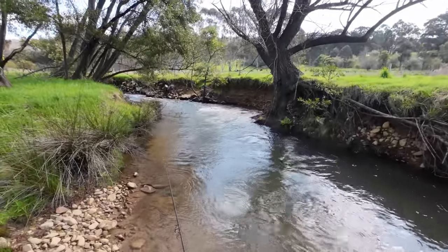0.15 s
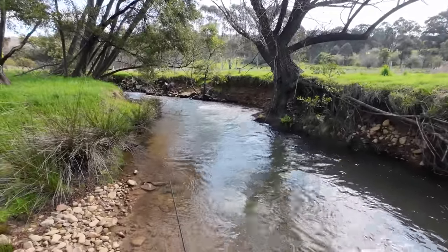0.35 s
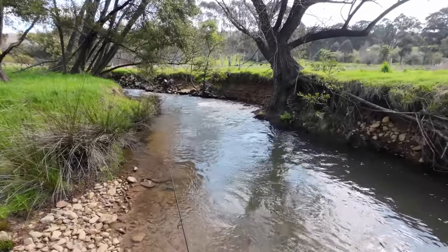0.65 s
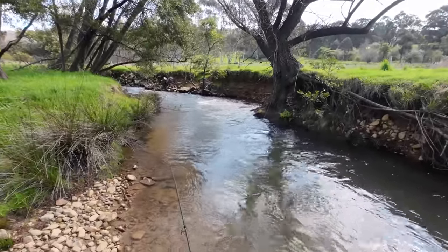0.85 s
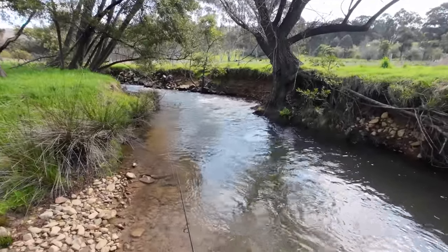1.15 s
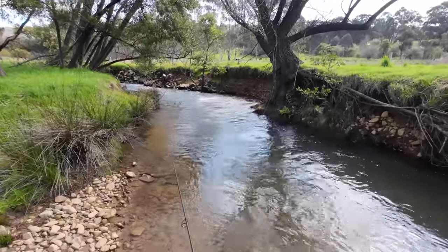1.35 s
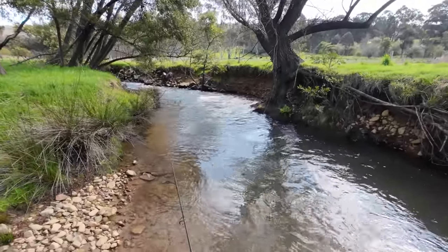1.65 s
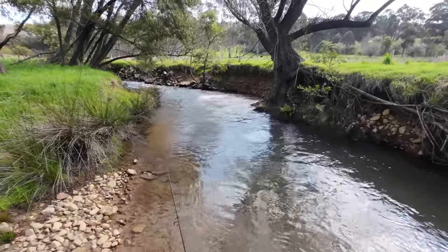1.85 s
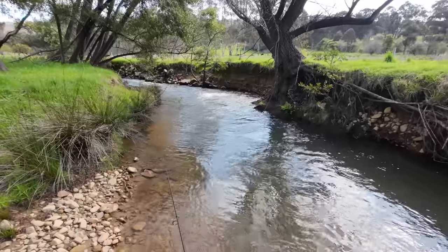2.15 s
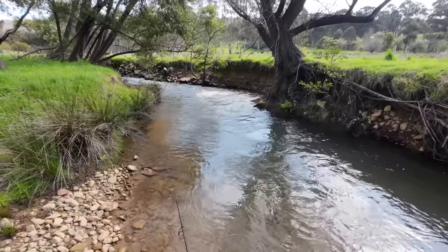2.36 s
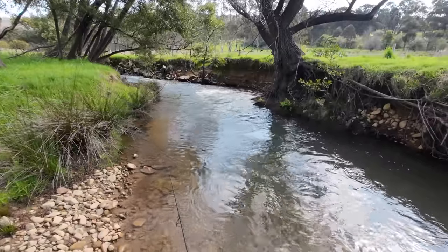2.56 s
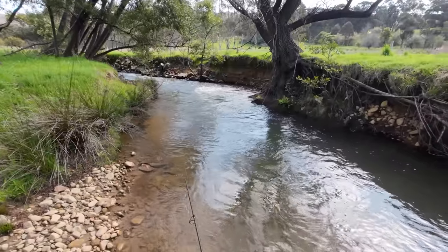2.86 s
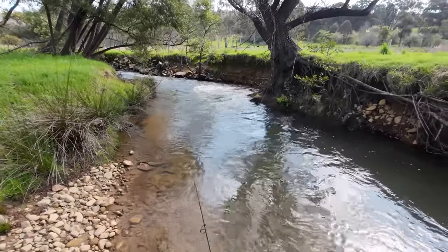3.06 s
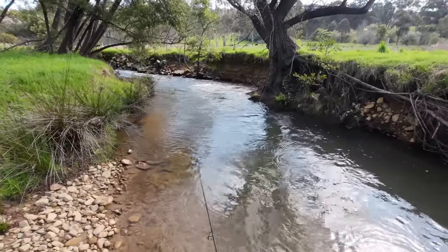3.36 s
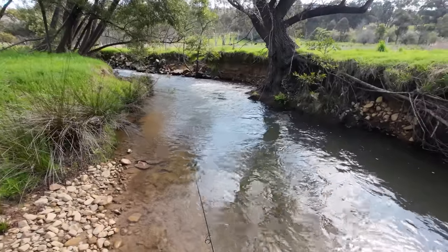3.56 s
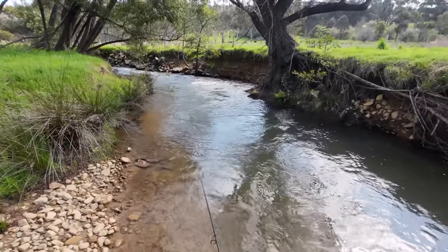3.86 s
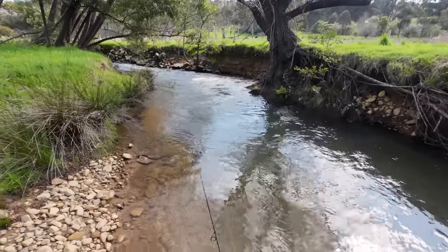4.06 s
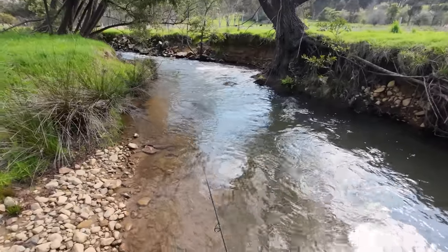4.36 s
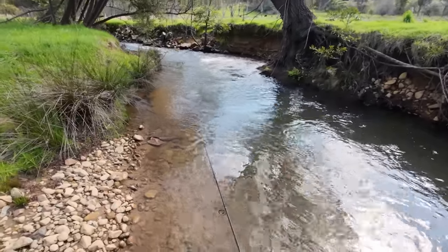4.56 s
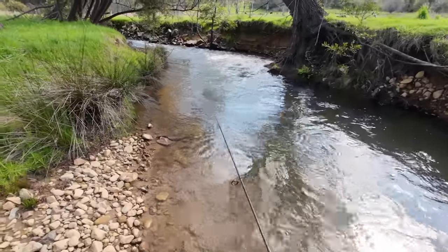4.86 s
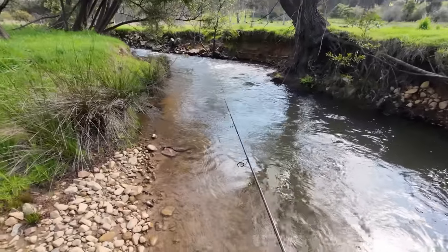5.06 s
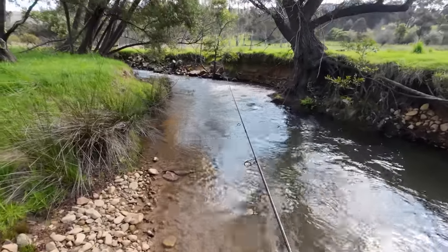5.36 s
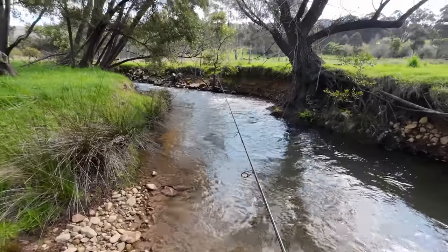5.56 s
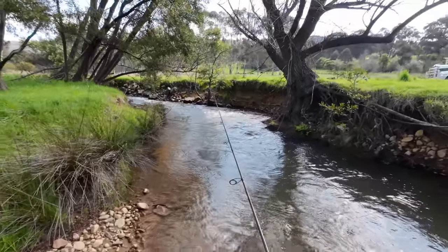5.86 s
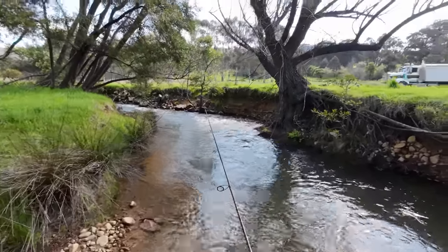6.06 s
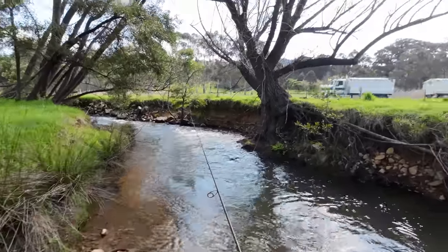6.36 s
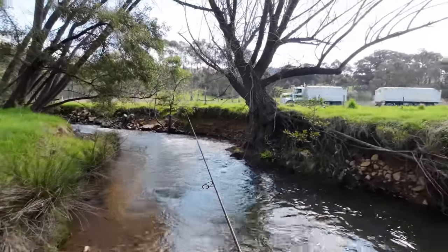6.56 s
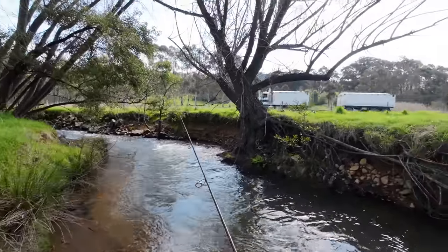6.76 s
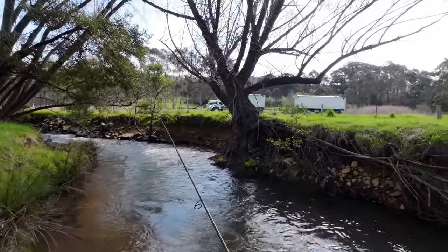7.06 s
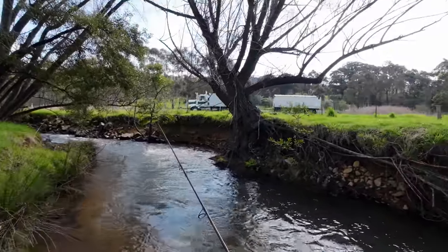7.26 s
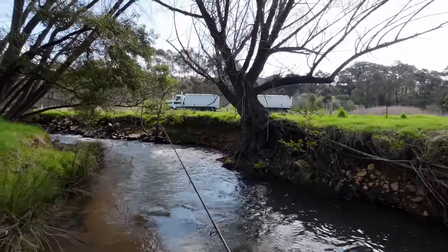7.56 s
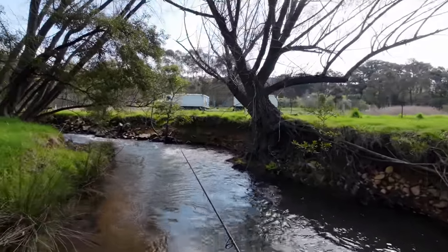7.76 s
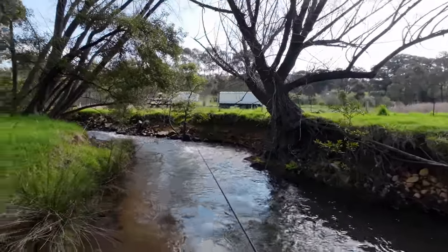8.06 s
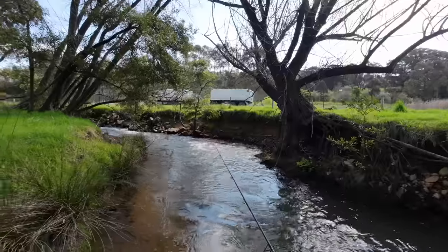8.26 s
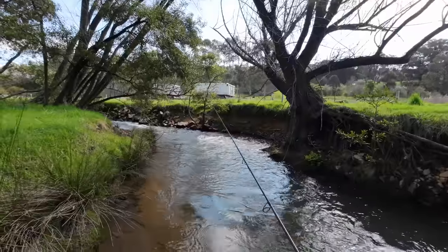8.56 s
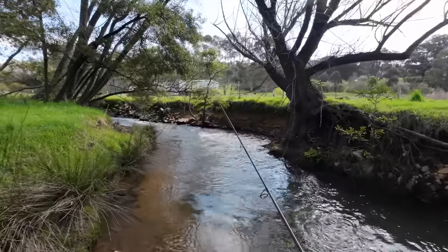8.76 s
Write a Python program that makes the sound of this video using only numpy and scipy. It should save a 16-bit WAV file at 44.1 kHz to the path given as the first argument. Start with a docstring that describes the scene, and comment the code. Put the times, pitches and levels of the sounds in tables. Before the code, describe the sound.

A heavy truck's engine brake drones and barks beyond a quiet creek, swelling through downshifts as it passes, dropping to a hum, then surging back.

```python
"""Engine brake beyond the creek

A six-cylinder truck comes down the road on its engine brake, shifts down twice and passes.
Each exhaust blast, a pulse with a puff of gas noise, rings the stack over a drone of firing orders.
Between the bursts the throttle hums and a turbo whistles; tyres roar as shaped noise with a tread hum.
Near the microphones the creek runs as steady noise, a small bird chips in quick sliding tones,
and fishing tackle clicks as short dying bursts of noise with a ping."""
import sys
import numpy as np
from scipy import signal
from scipy.fft import rfft, irfft, next_fast_len
from scipy.io import wavfile
from scipy.ndimage import uniform_filter1d, map_coordinates

SR = 44100
rng = np.random.default_rng(int(sys.argv[2]) if len(sys.argv) > 2 else 0)


def dump_mix(stems):
    """Bounce the given channels to the path in sys.argv[1] as a 16-bit WAV at rate SR."""
    frames = np.atleast_2d(stems).T  # one column per channel
    limited = np.clip(frames, -1, 1)  # hard clip at full scale
    pcm = np.round(limited * 32767).astype(np.int16)
    wavfile.write(sys.argv[1], SR, pcm)


N = 393633
T = np.arange(N) / SR  # s

# firing rate of the engine, sinking under the brake and revved up for each shift: time_s, firing_hz
FIRING_RATE = [(0.0, 66.44), (0.66, 62.14), (0.88, 76.74), (1.2, 70.5), (1.6, 74.66), (2.2, 70.45),
               (3.2, 65.51), (4.3, 59.68), (6.0, 51.55), (6.65, 50.26), (7.3, 69.22), (7.65, 66.09),
               (8.05, 62.56), (8.3, 64.2), (8.93, 61.6)]
# the three bursts of the brake, far off, passing and leaving: time_s, bark_db (before the exhaust mix)
FAR_BURST = [(0, -40), (0.561, -36.5)]
PASSING_BURST = [(1.535, -38), (2.0, -39), (2.7, -34.5), (3.5, -31.5), (4.3, -27), (5.1, -24),
                 (6.567, -20.5)]
LEAVING_BURST = [(8.321, -22.5), (8.93, -28.5)]
# the cylinders in firing order: blast_db (scaled by a contrast), lateness_s
CYLINDERS = np.array([(0, 0), (.6, .0006), (0, .0003), (-.8, -.0002), (2.3, 0), (-.4, .0003)])


def exhaust():
    """Drone, throttle and three bursts; the stack's colour turns as the truck draws level and leaves."""
    # the stack heard from ahead, drawing near, from the side and from behind: freq_hz, relative_db
    ahead_stack = [(150, -39), (280, -1), (360, 4.5), (450, 0.5), (540, -3.5), (700, -4), (950, -13.5),
                   (1300, -23), (2500, -38.5), (5000, -63.5)]
    nearing_stack = [(150, -55.5), (260, 9.5), (335, 5), (450, -2.5), (550, -11), (700, -15.5),
                     (1000, -18.5), (1400, -32.5), (1900, -45), (3000, -35.5), (5000, -79.5)]
    abreast_stack = [(130, -32), (220, -17), (275, 10.5), (355, 13.5), (420, 2), (520, -8.5), (680, -5),
                     (800, -11), (920, -11), (1100, -16), (1300, -26.5), (1800, -46), (2600, -31),
                     (6000, -91)]
    behind_stack = [(200, -29.5), (300, 6), (370, 5), (450, 3.5), (560, 1), (680, 1), (900, -2),
                    (1100, -18), (1600, -39), (2400, -32), (4000, -45), (8000, -47.5), (13000, -73)]
    # low resonances of the exhaust pipe: centre_hz, width_hz, relative_db
    pipe = [(38, 20, -19.5), (86, 11, -4.5), (172.4, 24, -1.5), (267, 21, -5)]
    pipe_behind = [(42, 20, -31), (129, 160, -8.5), (169.4, 15, 5.5), (259, 32, -32)]  # serves the far and the leaving burst
    firings = np.cumsum(curves(FIRING_RATE)[0]) / SR  # running count of firings
    flow = turbulence(firings)
    far = brake(firings, flow, FAR_BURST, nearing_stack, pipe_behind,
                rasp_db=-8.0, crack_db=-22.0, lope_db=3, echo=0.19, contrast=0.184)
    ahead = brake(firings, flow, PASSING_BURST, ahead_stack, pipe,
                  rasp_db=-7, crack_db=-9, lope_db=3, echo=0.18, contrast=1.0)
    nearing = brake(firings, flow, PASSING_BURST, nearing_stack, pipe,
                    rasp_db=-4, crack_db=-15.5, lope_db=-2, echo=0.29, contrast=0.59)
    abreast = brake(firings, flow, PASSING_BURST, abreast_stack, pipe,
                    rasp_db=-6.5, crack_db=-15.5, lope_db=-5.5, echo=0.46, contrast=.75)
    behind = brake(firings, flow, LEAVING_BURST, behind_stack, pipe_behind,
                   rasp_db=-7, crack_db=-9.5, lope_db=3.5, echo=0.6, contrast=0.55)
    # the passing burst crossfades from ahead to nearing to abreast
    near = np.clip((T - 2.5) / .9, 0, 1)
    level_with = np.clip((T - 4.3) / 0.88, 0, 1)
    passing = (1 - near) * ahead + near * (1 - level_with) * nearing + level_with * abreast
    rough = braking(PASSING_BURST) * uneven_part(passing, firings)
    bursts = rough + amp(2.5) * far + amp(0.7) * behind
    swell = firings - .02  # the slow pressure swell peaks just after each blast
    return drone(swell) + bursts + flares(firings, flow) + throttle(swell) + hard_cracks()


def brake(firings, flow, burst, stack, modes, rasp_db, crack_db, lope_db, echo, contrast):
    """A burst of the brake: blasts and their gas ring the stack; unequal cylinders lope in the low pipe modes."""
    pulses, uneven = blasts(firings, contrast)
    gas = puffs(pulses, flow, decay_s=0.0076)
    # only the hardest blasts steepen into a bright crack
    crack = filtered(unit(pulses ** 4), lambda f: 1j * f / (550 + 1j * f))
    # gas and crack, both lifted more in the treble
    lift = [(300, 8.3), (600, 15.0), (1200, 15.04)]
    rasp = filtered(amp(rasp_db) * gas + amp(crack_db) * crack, lambda f: amp(along(lift, f)))
    bark = unit(reflected(ring(pulses + rasp, stack), echo))

    def pipe_response(f):
        """Resonances of alternating sign, dulled above 320 Hz."""
        total = 0
        for k, (centre, width, db) in enumerate(modes):
            damping = 1j * f * width
            total = total + (-1) ** k * amp(db) * damping / (centre * centre - f * f + damping)
        return total / (1 + 1j * f / 320) ** 2

    lope = unit(filtered(uneven + 0.44 * gas, pipe_response))
    engaged = 1. * ((T >= burst[0][0]) & (T <= burst[-1][0]))
    engaged = uniform_filter1d(engaged, size=256)  # soft edges
    return engaged * amp(curves(burst)[0]) * (bark + amp(lope_db) * lope)


def blasts(firings, contrast, scatter_db=.45, jitter_s=.00008):
    """One pulse per firing, sized and timed by its cylinder; also the pulses' departures from their mean size."""
    at = np.flatnonzero(np.diff(np.floor(firings)))
    chance = rng.standard_normal((len(at), 2))
    blast_db, late_s = CYLINDERS[np.arange(len(at)) % len(CYLINDERS)].T
    size = amp(contrast * blast_db + scatter_db * chance[:, 0])
    shift = np.round(SR * (late_s + jitter_s * chance[:, 1])).astype(int)
    at = np.clip(at + shift, 0, N - 1)
    pulses, uneven = np.zeros((2, N))
    pulses[at] = size
    uneven[at] = size - size.mean()
    return unit(pulses), unit(uneven)


def turbulence(firings, count=3, size=1024):
    """Gas noise that each cylinder repeats at its every firing, slowly changing shape."""
    drift_per_s, fresh_share = 2.0, .12  # pace of the change; power share of noise that never repeats
    firing = np.floor(firings).astype(int)
    age = np.arange(N) - np.searchsorted(firing, firing)  # samples since the firing
    shapes = rng.standard_normal((count, len(CYLINDERS), size))
    shapes = shapes[:, firing % len(CYLINDERS), age % size]
    weights = np.array([wobble(drift_per_s) for _ in shapes])
    kept = np.sum(shapes * weights, axis=0) / np.linalg.norm(weights, axis=0)
    return np.sqrt(1 - fresh_share) * kept + np.sqrt(fresh_share) * rng.standard_normal(N)


def puffs(pulses, flow, decay_s):
    """A dying burst of gas noise after each pulse."""
    envelope = signal.lfilter([1], [1, -np.exp(-1 / (decay_s * SR))], pulses)
    return unit(envelope * flow)


def uneven_part(x, firings, count=8, size=12000):
    """What changes from blast to blast: x without the steady low orders, which belong to the drone."""
    step = np.exp(2j * np.pi * firings)
    turn = step
    for _ in range(count):
        steady = uniform_filter1d(x * turn.conj(), size=size)
        x = x - 2 * (turn * steady).real
        turn = turn * step
    return x


def reflected(x, echo):
    """The sound and its reflection, whose lag is longest with the truck nearest and sweeps a comb through it."""
    longest_lag_s, closest_s, pass_s = .0059, 7.05, 1.75
    late = T - longest_lag_s / np.hypot(1, (T - closest_s) / pass_s)
    return (x + echo * np.interp(late, T, x)) / np.hypot(1, echo)


def hard_cracks(echo=0.83):
    """Single blasts of the passing and leaving bursts crack hard and bright, hardest at 8.37 s."""
    # time_s, relative_db
    cracks = [(1.557, -22), (1.568, -34), (1.585, -26), (2.826, -29), (2.915, -24.5), (4.241, -24),
              (4.341, -21), (4.442, -23), (4.544, -23), (4.646, -23), (8.3256, -16.5), (8.372, -6.5),
              (8.454, -23), (8.511, -25), (8.607, -21), (8.702, -21), (8.752, -25), (8.847, -20),
              (8.894, -27)]
    # their colour: freq_hz, relative_db
    crack_colour = [(120, -22), (300, -7), (450, 7), (650, 10), (880, 3.5), (1150, -2), (1700, -32),
                    (2450, -6), (3200, -21.5), (4500, -31), (8000, -64), (13000, -84)]
    hits = np.zeros(N)
    for s, db in cracks:
        hits[round(s * SR)] = amp(db + 14.5)
    return reflected(ring(hits, crack_colour), echo)


def flares(firings, flow):
    """The blasts and their gas ring resonances that flare up and glide in pitch as the truck moves."""
    # start_s, end_s, start_hz, end_hz, width_hz, level_db
    resonances = [(3.5, 5.2, 374, 334, 69.5, -39), (6.102, 6.573, 370, 354, 45, -34),
                  (8.33, 8.746, 2470, 1970, 350, -52)]
    rise_share, release_s = 0.43, 0.036  # share of a flare spent rising; its fall
    pulses, _ = blasts(firings, contrast=1.3)
    source = pulses + puffs(pulses, flow, decay_s=0.0065)
    sound = np.zeros(N)
    for start, end, from_hz, to_hz, width_hz, db in resonances:
        hz = np.interp(T, [start, end], [from_hz, to_hz])
        turn = np.exp(2j * np.pi * np.cumsum(hz) / SR)
        # shifted down to zero pitch, low-passed and shifted back up
        slow = signal.lfilter(*signal.butter(2, width_hz / SR), source / turn)
        rung = unit((turn * slow).real)
        sound += amp(db) * gate(start, end, rise_share * (end - start), release_s) * rung
    return sound


def drone(firings, count=8):
    """The clean firing orders: smeared by the pipe from afar, one sharp pulse per firing from the side."""
    # the three lowest orders during the passing burst: time_s, level_db
    fundamental = [(1.535, -30), (1.65, -26), (2.1, -29), (2.5, -22), (2.9, -22), (3.3, -18), (4.1, -14.5),
                   (4.5, -15), (5.1, -18), (6.57, -20.5)]
    second = [(1.535, -34), (1.62, -24), (2.1, -25), (2.55, -21), (2.9, -27.5), (4.35, -26), (4.65, -37.5),
              (5.1, -27), (5.7, -34), (6.57, -31.5)]
    third = [(1.6, -27.5), (2.5, -28), (2.9, -35), (3.3, -29), (3.8, -28.5), (4.25, -20), (4.42, -34.5),
             (4.57, -20.5), (4.73, -22.5), (4.85, -41), (5.0, -23), (5.6, -29), (5.95, -18.5), (6.25, -21),
             (6.57, -25)]
    # the same three orders in the first and the last burst: level_db
    far_orders = [-23, -29.5, -29.5]
    leaving_orders = [-24.5, -25.5, -21.5]
    # two gliding resonances lift the orders above the third: time_s, centre_hz, peak_db
    low_focus = [(1.6, 293, -36.5), (2.55, 278, -31.5), (2.9, 330, -38.5), (3.3, 265, -38.5),
                 (3.7, 284, -31), (4.1, 276, -34.5), (4.4, 248, -26.5), (4.65, 298, -29.5),
                 (4.85, 306, -25), (5.1, 263, -25), (5.4, 244, -17), (5.7, 236, -18), (6.0, 215, -21),
                 (6.57, 195, -22.5)]
    high_focus = [(1.6, 540, -56), (2.1, 424, -40), (2.5, 448, -42), (3.7, 409, -38), (4.4, 388, -35.5),
                  (5.1, 369, -30), (5.4, 440, -33), (5.7, 403, -29.5), (6.0, 355, -29.5), (6.25, 350, -28),
                  (6.57, 343, -25.5)]
    resonances = [(*curves(low_focus), 47.5), (*curves(high_focus), 59.4)]  # width in Hz last
    hz, = curves(FIRING_RATE)
    far, passing, leaving = braking(FAR_BURST), braking(PASSING_BURST), braking(LEAVING_BURST)
    gains = []
    for rows, far_db, leaving_db in zip((fundamental, second, third), far_orders, leaving_orders):
        gains.append(passing * amp(curves(rows)[0]) + far * amp(far_db) + leaving * amp(leaving_db))
    for k in range(len(gains) + 1, count + 1):
        lift = sum(amp(db) * np.exp(-((k * hz - centre) / width) ** 2) for centre, db, width in resonances)
        gains.append(passing * lift)
    # the orders line up as the truck draws level, until it leaves
    from_s, over_s = 3.5, 1.5
    side = np.clip((T - from_s) / over_s, 0, 1) * (T < LEAVING_BURST[0][0])
    side_lag, dispersion = .11, .08  # cycles: equal steps from the side, growing with the order from afar
    tone = np.zeros(N)
    for k, gain in enumerate(gains, 1):
        lag = (k - 1) * (side * side_lag + (1 - side) * dispersion * k)
        tone += gain * np.cos(2 * np.pi * (k * firings - lag))
    return np.sqrt(2) * amp(.6 * wobble(14)) * tone


def throttle(firings, count=4):
    """With the brake off, each push on the throttle gives a soft hum with few overtones, over a faint idle."""
    # pushes during the shifts: start_s, end_s, fundamental_db, second_order_db
    pushes = [(.64, 1.055, -26, -40), (1.185, 1.257, -19.5, -38), (6.645, 7.002, -18.5, -47),
              (6.91, 7.56, -26.5, -30.5), (7.476, 7.903, -22, -31)]
    attack_s, release_s, fall_db = 0.13, 0.068, 11.5  # the fall is per order above the second
    deep, upper = amp(-38), amp(-43)  # lowest levels, held throughout
    for start, end, deep_db, second_db in pushes:
        push = gate(start, end, attack_s, release_s)
        deep = np.maximum(deep, amp(deep_db) * push)
        upper = np.maximum(upper, amp(second_db) * push)
    overtones = sum(amp(-fall_db * (k - 2)) * np.cos(2 * np.pi * k * firings) for k in range(2, count + 1))
    hum = deep * np.cos(2 * np.pi * firings) + upper * overtones
    return np.sqrt(2) * amp(1.5 * wobble(4.0)) * hum


def rolling():
    """Tyre roar, howl and hiss swell with the pass, tread hum sinks in pitch, rumble grows under the brake."""
    # colours of the noises, the howl thrown forward of the truck: freq_hz, relative_db
    roar_colour = [(160, -9.5), (280, -10.5), (450, -2), (570, -11.5), (700, -6.5), (980, -13), (1300, -15),
                   (1900, -19), (2800, -21.5), (3600, -23), (6000, -31), (9000, -55)]
    howl_colour = [(150, -29), (260, -2), (330, 3), (430, -3), (560, -29), (1000, -54)]
    hiss_colour = [(1800, -27), (3000, -24), (3600, 3), (4400, -9.5), (5200, 3.5), (6100, -1.5), (6800, -8),
                   (7600, -2), (8800, -11.5), (10000, -7.5), (11400, -7.5), (12400, -41), (15500, -53.5)]
    rumble_colour = [(12, -28), (25, 3), (45, 2), (90, -2), (160, -1), (240, -6.5), (350, -20),
                     (600, -25.5), (1200, -75.5)]
    roar = passing_by(closest_s=7.24, half_s=1.35, db=-39) * rush(roar_colour, patchy_db=1.1)
    roar = roar * amp(0.18 * wobble(20))
    howl = passing_by(closest_s=6.44, half_s=0.45, db=-32.5) * rush(howl_colour, patchy_db=1.0)
    hiss = passing_by(closest_s=6.4, half_s=0.65, db=-51) * rush(hiss_colour, patchy_db=.6)
    hiss = hiss * amp(.8 * wobble(5))
    engaged = braking(FAR_BURST) + braking(PASSING_BURST) + braking(LEAVING_BURST)
    rumble_db = -28 + 2 * engaged + 0.22 * wobble(6.7)
    rumble = amp(rumble_db) * rush(rumble_colour, patchy_db=1.5)
    # the tread's pitch glides down by its Doppler share to either side of 230.5 Hz
    doppler, abreast_s, turn_s = 0.066, 7.5, 0.495
    tread_hz = 230.5 * (1 - doppler * np.tanh((T - abreast_s) / turn_s))
    tone = np.sin(2 * np.pi * np.cumsum(tread_hz + 2 * wobble(7)) / SR)
    hum = unit(tone + .35 * fuzzy_tone(tread_hz, width_hz=30))
    from_s, rise_s = 5.8, .8
    tread = amp(-31.5) * np.clip((T - from_s) / rise_s, 0, 1) * hum
    return roar + howl + hiss + rumble + tread


def passing_by(closest_s, half_s, db):
    """Gain of a source on a straight road: one over its distance, 3 dB below the peak half_s from the closest."""
    return amp(db) / np.hypot(1, (T - closest_s) / half_s)


def whines():
    """Faint narrow tones of the rolling truck that come and go, sinking as it draws away."""
    # start_s, end_s, start_hz, end_hz, level_db
    tones = [(6.901, 7.901, 1374, 1280, -55.5), (7.5, 7.9, 702, 672, -49), (7.975, 8.3, 843, 825, -47)]
    sound = np.zeros(N)
    for start, end, from_hz, to_hz, db in tones:
        hz = np.interp(T, [start, end], [from_hz, to_hz])
        sound += amp(db) * gate(start, end, attack_s=0.14, release_s=.1) * fuzzy_tone(hz, width_hz=55)
    return sound


def turbo():
    """The turbo whistles, a fuzzy tone, as it runs down; air rushes in short swells of noise."""
    # whistle: time_s, pitch_hz, level_db
    whistle_glide = [(3.5, 6400, -83), (4.8, 5870, -59), (6.4, 5075, -53), (7.4, 5090, -94)]
    # swells of air, the first as the throttle is blipped: start_s, end_s, level_db
    swells = [(.62, 1.095, -46.5), (5.885, 6.052, -42.5), (6.33, 6.465, -47)]
    # colour of the air: freq_hz, relative_db
    air_colour = [(600, -22), (1000, 1), (1700, -10), (2400, 0.5), (3100, 1.5), (3900, -10), (6000, -12),
                  (8000, -37), (13000, -80)]
    rise_share, release_s = 0.87, 0.05  # share of a swell spent rising; its fall
    hz, db = curves(whistle_glide)
    whistle = amp(db) * unit(fuzzy_tone(hz, width_hz=400) + 0.75 * fuzzy_tone(hz, width_hz=1200))
    gain = sum(amp(air_db) * gate(start, end, rise_share * (end - start), release_s)
               for start, end, air_db in swells)
    return whistle + gain * rush(air_colour, patchy_db=2.0)


def tackle():
    """Rod and reel click close by: a bright snap, a duller body, a small metal ping and a faint after-ring."""
    # time_s, relative_db, t60_s, body_db and ping_db against the click
    clicks = [(5.831, -7, 0.007, -28, -40), (6.126, -40, .012, 14, -30), (6.2011, -12, 0.0068, -20, -18.5),
              (6.227, -22, 0.025, -8, -30), (6.2404, -19, 0.03, 9.5, -12), (6.748, -9, 0.0094, -13, -36)]
    # colours of snap and body: freq_hz, relative_db
    snap_colour = [(3000, -29), (5000, -14.5), (8000, -13), (10500, -1.5), (12500, -7.5), (15500, -38)]
    body_colour = [(700, -37), (2000, -0.5), (3500, 1), (4800, -7), (6300, 4), (7500, -6.5), (12000, -16)]
    snap, body = np.zeros((2, 2, N))
    ping = np.zeros(N)
    t = np.arange(SR // 8) / SR
    for s, db, t60, body_db, ping_db in clicks:
        i = round(s * SR)
        after_ring = amp(-21.5 - 60 * t / 0.089)
        decay = amp(db - 10.5) * (amp(-60 * t / t60) + after_ring)
        # noise partly shared by the two microphones
        burst = decay * (rng.standard_normal(len(t)) + .5 * rng.standard_normal((2, len(t))))
        snap[:, i:][:, :len(t)] += burst
        body[:, i:][:, :len(t)] += amp(body_db) * burst
        ping[i:][:len(t)] += amp(db + ping_db - 60 * t / 0.055) * np.sin(2 * np.pi * 4850 * t)
    return ping + np.array([ring(a, snap_colour) + ring(b, body_colour) for a, b in zip(snap, body)])


def bird():
    """Thin, quick chips of a small bird, most of them sliding down."""
    # time_s, start_hz, relative_db, length_s, fall (share of the start pitch; below zero it rises)
    chips = [(.04, 6800, -56, .015, .26), (.224, 6300, -57, .017, .16), (.41, 6400, -55, .018, .19),
             (.472, 6500, -60, .009, -.05), (.488, 5300, -60, .012, 0), (.587, 6600, -57, .014, .08),
             (.636, 7100, -58, .012, .15), (.645, 3600, -52, .011, -.05), (.655, 5550, -55, .021, .13),
             (.828, 6700, -58, .012, .14), (1.032, 5600, -58, .022, .13), (1.21, 5550, -58, .018, .1)]
    song = np.zeros(N)
    for s, start_hz, db, length_s, fall in chips:
        u = np.linspace(0, 1, int(length_s * SR))
        hz = start_hz * (1 - fall * u)
        chip = np.sin(np.pi * u) * np.sin(2 * np.pi * np.cumsum(hz) / SR)
        song[round(s * SR):][:len(u)] += amp(db + 4) * chip
    return song + amp(-12) * banks(song, t60=.25)


def creek():
    """Shallow water runs steadily over stones: coloured noise with a slight wavering."""
    # freq_hz, relative_db
    water_colour = [(180, -27), (300, -2.5), (392, -11), (860, -11.5), (1320, -19), (3430, -26),
                    (4410, -35.5), (5590, -30.5), (8960, -40.5), (10300, -36.5), (11700, -40),
                    (12900, -68.5), (16700, -104), (22000, -120)]
    return amp(-44 + 0.43 * wobble(5)) * rush(water_colour, patchy_db=1.66)


def banks(x, t60, size=256):
    """Trees and creek banks scatter a short answer, thin in the bass, to each side after a brief gap."""
    t = np.arange(SR // 2) / SR
    tail = rng.standard_normal((2, len(t))) * amp(-60 * t / t60) * (t > size / SR)
    wet = signal.fftconvolve(x[None], tail / np.linalg.norm(tail[0]), axes=1)[:, :N]
    colour = [(100, -27.0), (400, -8.5), (1200, 1.0), (6000, 10.5)]  # Hz, dB
    return filtered(wet, lambda hz: amp(along(colour, hz)))


def rush(spectrum, patchy_db):
    """Stereo noise of rms 1 with drifting patches of gain."""
    # likeness of the two microphones: freq_hz, correlation
    alike = [(30, 0.1), (100, 0.86), (300, 0.94), (800, 0.99), (2000, 0.94), (5000, 0.52), (11000, 0.072)]
    z = signal.stft(rng.standard_normal((2, N)), nperseg=512)[2]
    field = uniform_filter1d(rng.standard_normal(z.shape[1:]), size=6, axis=0)  # smooth over frequency
    field = uniform_filter1d(field, size=14, axis=1)  # and over time
    pair = signal.istft(z * amp(patchy_db * unit(field)), nperseg=512)[1][:, :N]

    def mid_side(hz):
        """Colour, shared between mid and side by the likeness."""
        turn = np.arccos(np.clip(along(alike, hz), -1, 1)) / 2
        return amp(along(spectrum, hz)) * [np.cos(turn), np.sin(turn)]

    mid, side = filtered(pair, mid_side)
    return unit(np.array([mid + side, mid - side]))


def fuzzy_tone(hz, width_hz):
    """A narrow band of noise of rms 1 around a moving pitch."""
    phase = 2 * np.pi * np.cumsum(hz) / SR
    return unit(wobble(width_hz) * np.cos(phase) + wobble(width_hz) * np.sin(phase))


def ring(x, spectrum, size=8192):
    """x through a causal minimum-phase filter of unit energy with the given colour."""
    cep = irfft(np.log(amp(along(spectrum, np.fft.rfftfreq(size, 1 / SR)))))
    # folding the cepstrum onto positive times makes the filter causal
    cep[1:size // 2] *= 2
    cep[size // 2 + 1:] = 0
    response = irfft(np.exp(rfft(cep)))
    return signal.fftconvolve(x, response / np.linalg.norm(response))[:N]


def filtered(x, response):
    """x times a complex response of frequency."""
    m = next_fast_len(N + SR // 2)
    return irfft(rfft(x, m) * response(np.fft.rfftfreq(m, 1 / SR)), m)[..., :N]


def gate(start, end, attack_s, release_s):
    """Rises from start, holds until end, then falls."""
    return np.clip((T - start) / attack_s, 0, 1) * np.clip(1 - (T - end) / release_s, 0, 1)


def braking(burst):
    """1 while a burst of the brake lasts, with short ramps."""
    return gate(burst[0][0], burst[-1][0], attack_s=0.026, release_s=0.038)


def wobble(rate):
    """A smooth random curve, rate knots a second."""
    return map_coordinates(rng.standard_normal(int(N * rate / SR) + 4), [T * rate])


def curves(rows):
    """One value per sample for each column after the time."""
    s, *cols = np.transpose(rows)
    return [np.interp(T, s, c) for c in cols]


def along(points, hz):
    """(Hz, value) points joined on a log frequency axis."""
    f, v = np.transpose(points)
    return np.interp(np.log(hz + 1), np.log(f + 1), v)


def amp(db):
    """Decibels to gain."""
    return 10 ** (np.asarray(db) / 20)


def unit(x):
    """Scaled to rms 1."""
    return x / np.sqrt(np.mean(x ** 2) + 1e-20)


def scene():
    """The truck beyond the creek with its answer from the banks; tackle, bird and water near by."""
    engine = exhaust()
    truck = engine + amp(-11.5) * banks(engine, t60=0.18) + rolling() + whines() + turbo()
    return truck + tackle() * amp([[1], [-1]]) + bird() + creek()  # tackle leans to the left


def record(dry):
    """The left microphone is a little weaker in the bass; nothing passes the band limit."""
    top_hz = 15750

    def pair_response(hz):
        """Left and right gain, set apart by the lean in dB."""
        lean_db = along([(50, -1.6), (130, -0.06), (1000, 0.2)], hz)
        return amp([lean_db / 2, -lean_db / 2]) * (hz < top_hz)

    return filtered(dry, pair_response)


dry = scene()
out = record(dry)
dump_mix(out)
```